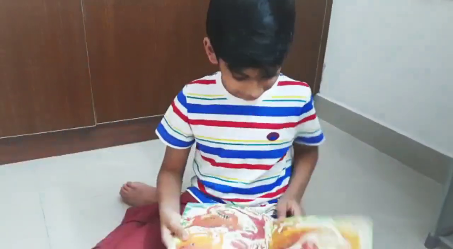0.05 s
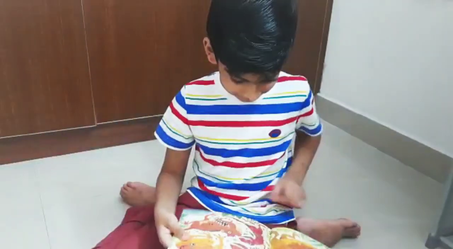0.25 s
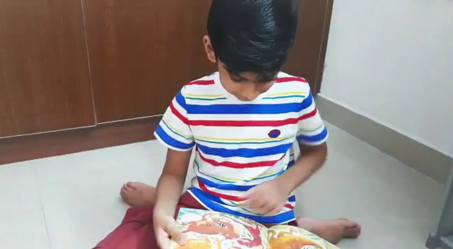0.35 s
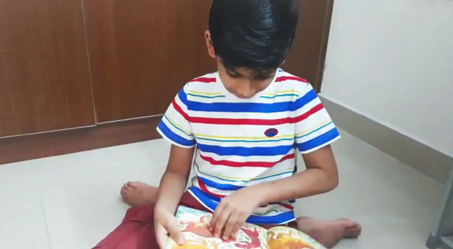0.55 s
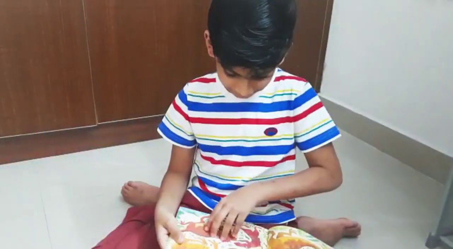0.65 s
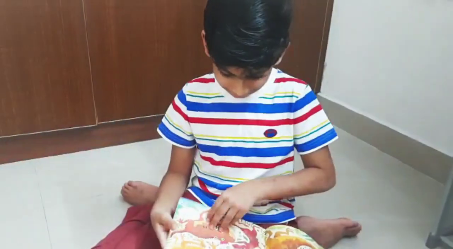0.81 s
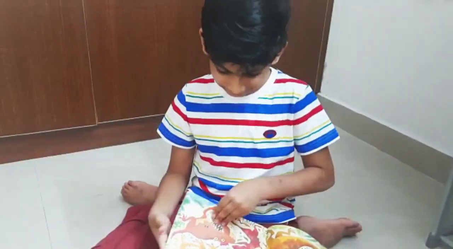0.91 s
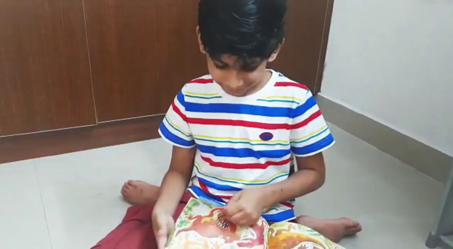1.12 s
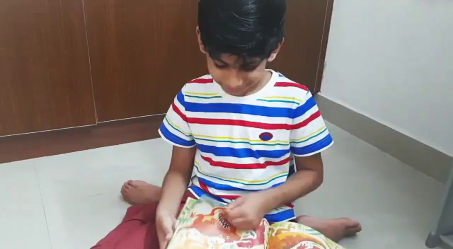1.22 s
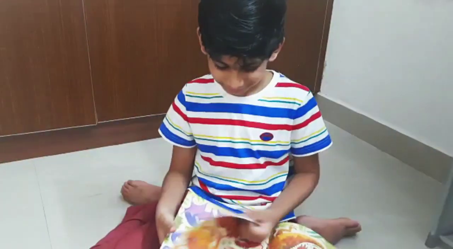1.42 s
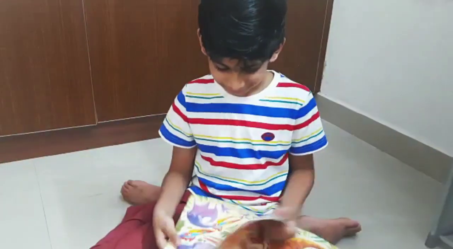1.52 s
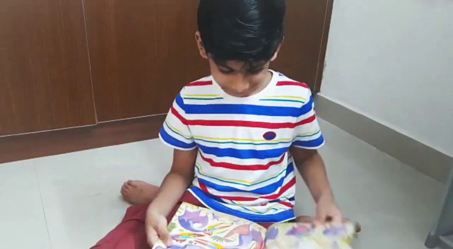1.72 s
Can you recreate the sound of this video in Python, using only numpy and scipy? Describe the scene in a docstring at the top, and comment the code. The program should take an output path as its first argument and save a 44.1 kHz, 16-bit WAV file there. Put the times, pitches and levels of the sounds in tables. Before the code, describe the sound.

A book slaps onto a hard floor at about 0.25 seconds, just after a faint paper rustle. The loud crack rings for half a second in a small, quiet, bare room. A hand brushes the paper softly. From about 1.1 seconds a stiff page lifts and buckles in a run of quieter snaps, swishing down and landing flat near 1.5 seconds. The left side sounds muffled, the right brighter.

```python
"""A hand brushes faintly over paper in a small, bare, quiet room, and at once an open picture book
is slapped down on the hard floor. The blow cracks, echoes off nearby surfaces and rings on.
The hand brushes the book again, slides under a page and turns it: the stiff sheet buckles
in a run of snaps, swishes down and lands flat.
The left microphone is muffled, so the treble is on the right."""
import sys
import numpy as np
from scipy import signal
from scipy.fft import rfft, irfft, next_fast_len
from scipy.io import wavfile

SR = 44100
rng = np.random.default_rng(int(sys.argv[2]) if len(sys.argv) > 2 else 0)


def unload_wav(signal):
    """Save mono or channel-first audio to the path in sys.argv[1] as 16-bit WAV at rate SR, clipped to [-1, 1]."""
    wavfile.write(
        sys.argv[1],
        SR,
        np.round(np.clip(np.atleast_2d(signal).T, -1, 1) * 32767).astype(np.int16),
    )


N = 77175
T = np.arange(N) / SR
BIN_HZ = np.arange(N // 2 + 1) * SR / N


def from_db(db):
    """Turn decibels into a number to multiply by."""
    return 10 ** (np.asarray(db) / 20)


def rms_one(x):
    """Scale a signal so its average power is 1."""
    return x / np.sqrt(np.mean(x ** 2) + 1e-20)


def at_hz(points, hz):
    """Read between the rows of a table, on a scale where all octaves are equally wide."""
    row_hz, value = np.transpose(points)
    return np.interp(np.log(np.maximum(hz, 1)), np.log(row_hz), value)


def colour(x, spectrum):
    """Turn each frequency up or down by a table of Hz and dB."""
    size = 2 * next_fast_len(N)
    gain = from_db(at_hz(spectrum, np.linspace(0, SR / 2, size // 2 + 1)))
    cepstrum = irfft(np.log(gain))
    # minimum phase: the filter never sounds before its input does
    cepstrum[1:size // 2] *= 2
    cepstrum[size // 2 + 1:] = 0
    return irfft(rfft(x, size) * np.exp(rfft(cepstrum)))[..., :N]


def fade(start, decay):
    """Jump to 1 at the start, then die away."""
    return (T >= start) * np.exp(-np.maximum(T - start, 0) / decay)


def ring(start, hz, ring_s):
    """A struck tone. Its ring time is how long it takes to fall by 60 dB."""
    return fade(start, ring_s / np.log(1000)) * np.sin(2 * np.pi * hz * (T - start))


# How alike left and right are in the room. Each row: frequency in Hz, likeness from 0 to 1.
SIDE_LIKENESS = [(50, 0.58), (130, 0.66), (300, 0.99), (600, 0.85), (1200, 0.14), (3000, 0.12),
                 (10000, 0.093)]

def stereo_noise_spectrum():
    """Left and right white noise, as alike as the room makes them at each frequency."""
    mid, side = rfft(rng.standard_normal((2, N)))
    alike = np.clip(at_hz(SIDE_LIKENESS, BIN_HZ), 0, 1)
    return (np.sqrt(1 + alike) * mid + np.sqrt(1 - alike) * side * [[1], [-1]]) / np.sqrt(2)


# The tone of the quiet room. Each row: frequency in Hz, relative level in dB.
HUSH_COLOUR = [(25, -27.5), (65, 1), (105, 2), (170, -5), (350, 0.5), (550, -2), (950, -13.5), (1800, -14),
               (2700, -28), (9000, -29), (10500, -33.5), (15000, -48.5)]

def room_hush():
    """The room hushes, low and steady, under everything."""
    return from_db(-53.5) * rms_one(colour(irfft(stereo_noise_spectrum(), N), HUSH_COLOUR))


def friction(strokes, spectrum, spread_db, grain_share, grains_per_s=2600):
    """Fibres catch and slip during each stroke: tiny clicks of uneven size in a smooth hiss."""
    level = 0
    for start, rise, hold, decay, db in strokes:
        swell = np.clip((T - start) / rise, 0, 1) ** 2
        fall = np.exp(-np.maximum(T - start - rise - hold, 0) / decay)
        level = level + from_db(db) * swell * fall
    grains = (rng.random(N) < grains_per_s / SR) * rng.choice([-1, 1], N)
    sizes = from_db(spread_db * np.minimum(rng.exponential(1, N), 3))
    clicks = np.sqrt(grain_share) * rms_one(grains * sizes)
    hiss = np.sqrt(1 - grain_share) * rng.standard_normal(N)
    return level * rms_one(colour(clicks + hiss, spectrum))


# Light touches. Each row: start, rise, hold and fade times in seconds, level in dB.
BRUSH_STROKES = [(0.118, 0.015, 0.06, 0.015, -52.5), (0.53, .02, 0.2, 0.027, -66),
                 (0.845, 0.0048, 0.46, 0.061, -64.5)]
# Their airy tone. Each row: frequency in Hz, relative level in dB.
BRUSH_TONE = [(1000, -13), (3000, -5), (6500, 0.5), (8300, -4), (9200, -0.5), (10200, -9), (15000, -12)]

def hand_brushes():
    """Skin and sleeve brush faintly over the page."""
    return friction(BRUSH_STROKES, BRUSH_TONE, spread_db=-2.5, grain_share=0.6)


# Bends of the paper. Each row: start, rise, hold and fade times in seconds, level in dB.
FLEX_STROKES = [(0.115, 0.035, 0.25, 0.042, -49), (0.6, 0.059, 0.092, 0.11, -63),
                (0.92, 0.14, 0.1, 0.011, -48.5), (1.18, 0.025, 0.016, 0.058, -44),
                (1.285, 0.0063, 0.17, 0.049, -43)]
# Their dull tone. Each row: frequency in Hz, relative level in dB.
FLEX_TONE = [(40, -32), (70, -1), (130, -12.5), (270, 4.5), (430, 4), (660, -6.5), (900, -1.5),
             (1400, -11.5), (2000, -6.5), (3500, -31.5), (10000, -38)]

def book_flexes():
    """The sheet and the book bend under the hand with a low rustle."""
    return friction(FLEX_STROKES, FLEX_TONE, spread_db=5, grain_share=0.61)


# Swishes of paper. Each row: start, rise, hold and fade times in seconds, level in dB.
SLIDE_STROKES = [(0.115, 0.068, 0.12, 0.019, -53), (0.52, 0.025, 0.16, 0.042, -66),
                 (0.84, 0.018, 0.5, 0.08, -68.5), (1.28, 0.13, 0.03, 0.024, -34.5),
                 (1.69, 0.017, 0.036, 0.015, -54.5)]
# Their bright tone. Each row: frequency in Hz, relative level in dB.
SLIDE_TONE = [(200, -1), (680, -10.5), (1200, 7), (1900, 6), (2500, 4.5), (3400, 3), (4400, 3.5),
              (6500, 3.5), (8000, -3.5), (10000, -9), (15000, -12)]

def paper_slides():
    """Paper rubs on paper or skin, loudest as the page turns."""
    return friction(SLIDE_STROKES, SLIDE_TONE, spread_db=3, grain_share=0.71)


def pop(start, hz, ring_cycles=20.4, rise_s=0.00042):
    """The sheet buckles: one main tone swells quickly, with two quieter ones at random pitches."""
    main = ring(start, hz, ring_cycles / hz)
    partners = sum(ring(start, f, ring_cycles / f) for f in hz * rng.uniform(0.5, 1.36, size=2))
    return (main + from_db(-10.5) * partners) * (1 - fade(start, rise_s))


def crackle(start, hz, decay_s=0.001493, width_hz=700):
    """A crease gives way: a few milliseconds of noise swell and die, ringing at their own pitch."""
    age = np.maximum(T - start, 0) / decay_s
    burst = age * np.exp(1 - np.minimum(age, 40)) * rng.standard_normal(N)
    ringing = signal.lfilter(*signal.iirpeak(hz, hz / width_hz, fs=SR), burst + 1e-18)
    return burst + from_db(6) * ringing


# Finger taps and buckles of the sheet. Each row: start in seconds, pop level in dB,
# pop pitch in Hz, crackle level in dB, crackle pitch in Hz.
PAPER_SNAPS = [(0.121, -43, 1000, -66, 4000), (0.192, -26, 3110, -35, 5960), (0.945, -40, 980, -68, 4000),
               (1.040, -41.5, 820, -44, 4300), (1.068, -43, 844, -42, 5040), (1.099, -29, 897, -42, 5130),
               (1.139, -41, 750, -41, 5600), (1.225, -24, 1880, -23.5, 2880), (1.2777, -29, 913, -25, 4880),
               (1.2933, -20.5, 947, -24.5, 4540), (1.3067, -16, 1720, -18.5, 5540),
               (1.3181, -23, 1670, -22.5, 6000), (1.3292, -27.5, 820, -24.5, 4230),
               (1.345, -25, 1030, -25.5, 4800), (1.355, -27, 1000, -23, 4950),
               (1.3661, -21, 1780, -21.5, 6200), (1.3742, -11.5, 1810, -29.5, 6200),
               (1.386, -21, 1880, -34, 2580), (1.3953, -16, 1915, -28, 4770),
               (1.3996, -30, 1010, -20, 6800), (1.4316, -23, 1010, -25.5, 4530),
               (1.549, -32.5, 784, -29.5, 3980)]
# The tone of the crackle. Each row: frequency in Hz, boost or cut in dB.
CRACKLE_TONE = [(200, -4), (1000, -0.5), (2000, 3), (3000, -4), (6000, -6), (8000, -8.5), (10000, -18),
                (15000, -21)]
# The stack of pages knocks under the hand. Each row: start in seconds, pitch in Hz, level in dB.
BOOK_KNOCKS = [(1.098, 364, -38), (1.199, 376, -39.5), (1.213, 486, -35), (1.308, 379, -26.5),
               (1.332, 420, -33), (1.401, 449, -26.5)]

def snaps_and_knocks():
    """Each snap of the sheet is a pop plus a crackle; now and then the stack of pages knocks."""
    pops = sum(from_db(db) * pop(start, hz) for start, db, hz, _, _ in PAPER_SNAPS)
    knocks = sum(from_db(db) * ring(start, hz, ring_s=0.05) for start, hz, db in BOOK_KNOCKS)
    crackles = sum(from_db(db) * crackle(start, hz) for start, _, _, db, hz in PAPER_SNAPS)
    bass_cut = signal.butter(2, 250, "high", fs=SR, output="sos")
    return signal.sosfilt(bass_cut, pops + knocks) + colour(crackles, CRACKLE_TONE)


def swing_thud():
    """The book gives a soft, low thud as it is swung."""
    return from_db(-51) * ring(start=0.13, hz=105, ring_s=0.9)


SLAP_S = 0.2462
# The tones of the blow and of its sharp crack. Each row: frequency in Hz, relative level in dB.
BLOW_TONE = [(50, -38.5), (130, -8.5), (220, -1.5), (360, 5), (560, 3.5), (800, 3.5), (1350, 13.5),
             (1900, 9), (2450, -13.5), (3400, 5), (4200, -6.5), (5500, -2), (7500, -5), (10200, -32),
             (15000, -28)]
CRACK_TONE = [(400, -12.5), (1300, -5.5), (2400, -25), (3500, -2.5), (4150, -14.5), (5100, 5.5), (7400, -5),
              (9000, -9.5), (10200, -20.5), (15000, -17.5)]
# The stiff cover rings for an instant. Each row: pitch in Hz, level in dB, ring time in seconds.
COVER_RINGS = [(382.6, -11, 0.058), (764, -13.5, 0.055), (1017, -8.5, .026), (1460, -8, 0.0085),
               (3680, -10, 0.0084), (5050, 0.5, 0.0045), (7230, -20.5, 0.004)]

def slap():
    """The cover lands flat: one blow, a millisecond of crack and tones that swing opposite ways."""
    click = 1.0 * (np.arange(N) == int(SLAP_S * SR))
    blow = rms_one(colour(click, BLOW_TONE)) / np.sqrt(N)
    crack = rms_one(colour(rng.standard_normal(N), CRACK_TONE)) * fade(SLAP_S, decay=0.0011)
    cover = sum((-1) ** k * from_db(db) * ring(SLAP_S, hz, ring_s)
                for k, (hz, db, ring_s) in enumerate(COVER_RINGS))
    return from_db(12) * blow + from_db(-7) * crack + cover


ROOM_RISE_S = 0.0088
# How long sound lingers in the room. Each row: frequency in Hz, ring time in seconds.
ROOM_RING_TIMES = [(100, 0.76), (400, 0.52), (1500, 0.52), (4000, 0.5), (8000, 0.46), (14000, 0.55)]

def room_response():
    """The room answers a click with a wash of echoes; each frequency band dies at its own rate."""
    noise, tail = stereo_noise_spectrum(), 0
    for band_hz, ring_s in ROOM_RING_TIMES:
        band = at_hz([(hz, hz == band_hz) for hz, _ in ROOM_RING_TIMES], BIN_HZ)
        tail = tail + irfft(noise * band, N) * fade(0, ring_s / np.log(1000))
    swell = np.minimum(T / ROOM_RISE_S, 1) ** 2
    return rms_one(tail * swell) / np.sqrt(N)


# Hard surfaces nearby throw the slap back. Each row: delay in seconds, gain in dB.
FIRST_ECHOES = [(.0045, -4), (0.0109, -9.5), (0.016, -6.5)]
# Tones that linger after the slap. Each row: pitch in Hz, level in dB, ring time in seconds.
LONG_RINGS = [(378.5, -20.5, 0.45), (530, -28, .5), (560.4, -26.5, .5), (589, -25, 0.54), (739.3, -25, 0.5),
              (807, -25.5, 0.42), (954.6, -23.5, 0.53), (1011, -23.5, 0.43), (1154, -28.5, 0.49),
              (1224, -31.5, 0.55), (1334, -28, 0.29), (1580, -29.5, 0.55), (1676, -30, 0.55),
              (1763, -28.5, 0.59), (3460, -28.5, 0.52), (3585, -33.5, 0.45)]
# The tone of the slap as the room sends it back. Each row: frequency in Hz, relative level in dB.
TAIL_TONE = [(50, -25), (150, -19), (240, -14.5), (360, -5), (470, -6.5), (560, -3), (660, -7), (780, 0),
             (1200, -2), (1700, -1.5), (2400, -11.5), (3000, -9), (3500, -8.5), (4100, -14.5),
             (4900, -12.5), (5800, -20.5), (7500, -24), (10500, -38), (15000, -50)]

def slap_in_room(room):
    """The slap is followed by dull first echoes, lingering tones and the room's fading wash."""
    hit = slap()
    echoes = sum(from_db(db) * np.interp(T - delay, T, hit) for delay, db in FIRST_ECHOES)
    echoes = signal.sosfilt(signal.butter(1, 2000, fs=SR, output="sos"), echoes)
    rings = sum(from_db(db) * ring(SLAP_S - rng.random() / hz, hz, ring_s)
                for hz, db, ring_s in LONG_RINGS)
    rings *= np.clip((T - SLAP_S) / ROOM_RISE_S, 0, 1)
    tail = rms_one(colour(room, TAIL_TONE)) / np.sqrt(N)
    tail = np.pad(tail, ((0, 0), (int(SLAP_S * SR), 0)))[:, :N]  # starts with the slap
    return hit + echoes + rings + from_db(19) * tail


# The page is picked up. Each row: start, rise, hold and fade times in seconds, level in dB.
LIFT_STROKES = [(1.156, 0.042, 0.023, 0.0073, -31.5)]
# Its hissy tone. Each row: frequency in Hz, relative level in dB.
LIFT_TONE = [(200, -7.5), (1200, -8.5), (1900, -6), (2900, -3), (3400, -3.5), (4300, 5), (5500, -1.5),
             (7200, -5), (8500, -7.5), (10000, -16), (15000, -21)]

def page_lift():
    """Fingers slide under the page and lift it."""
    return friction(LIFT_STROKES, LIFT_TONE, spread_db=2.5, grain_share=0.25)


# The page's last sweep. Each row: start, rise, hold and fade times in seconds, level in dB.
LANDING_STROKES = [(1.452, 0.021, 0.01, 0.02, -25.5)]
# The tone of that sweep. Each row: frequency in Hz, relative level in dB.
LANDING_TONE = [(80, -30), (200, -11), (500, -6.5), (1250, -7), (1600, 4.5), (2100, 5), (2900, -5),
                (3600, 2.5), (4100, -1.5), (4900, -2), (6500, -6), (8000, -18.5), (10000, -24),
                (15000, -41)]
# The page hits and rings. Each row: pitch in Hz, level in dB, ring time in seconds.
PAGE_RINGS = [(1556, -27, .09), (1720, -33, 0.13), (2190, -30.5, 0.087), (2717, -26, 0.037),
              (3538, -30, 0.1), (4560, -23, 0.03), (4980, -23, 0.029), (6060, -25, 0.037)]

def page_landing(hit_s=1.4755, scatter_s=0.001493):
    """The page sweeps onto the others and rings; its tones swing opposite ways, so there is no thump."""
    sweep = friction(LANDING_STROKES, LANDING_TONE, spread_db=5, grain_share=0.72)
    flop = sum((-1) ** k * from_db(db) * ring(hit_s + scatter_s * rng.random(), hz, ring_s)
               for k, (hz, db, ring_s) in enumerate(PAGE_RINGS))
    return sweep + flop


def scene():
    """Hand, book and page all sound in the same room."""
    room = room_response()
    handling = hand_brushes() + book_flexes() + swing_thud()
    page = page_lift() + snaps_and_knocks() + paper_slides() + page_landing()
    paper = handling + page
    paper_echoes = from_db(-3.5) * signal.fftconvolve(paper[None], room)[:, :N]
    return slap_in_room(room) + paper + paper_echoes + room_hush()


# The muffled left microphone. Each row: frequency in Hz, boost or cut in dB.
LEFT_MIC_TONE = [(60, 1), (200, 0.5), (500, -2.5), (800, -5), (1250, -6), (1800, -12), (2800, -15),
                 (4300, -22.5), (6400, -44), (9000, -35), (15000, -19)]

def record(dry, rumble_hz=91, overload=0.85, top_hz=15600):
    """The left microphone is dull and hisses faintly; the slap overloads; rumble and top are cut."""
    dry = signal.sosfilt(signal.butter(1, rumble_hz, "high", fs=SR, output="sos"), dry)
    left = colour(dry[0], LEFT_MIC_TONE) + from_db(-77) * rng.standard_normal(N)
    clipped = np.clip([left, dry[1]], -overload, overload)
    return signal.sosfilt(signal.ellip(10, 0.2, 80, top_hz, fs=SR, output="sos"), clipped)


dry = scene()
out = record(dry)
unload_wav(out)
```